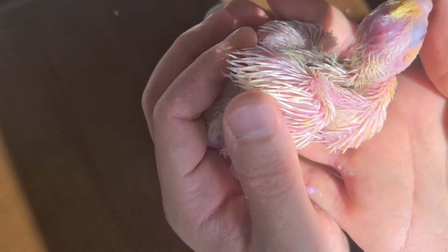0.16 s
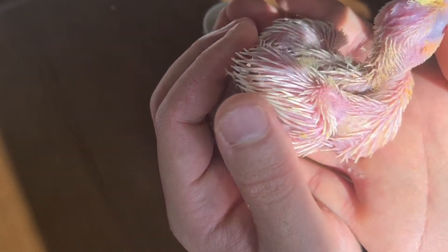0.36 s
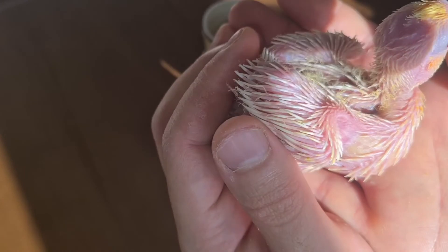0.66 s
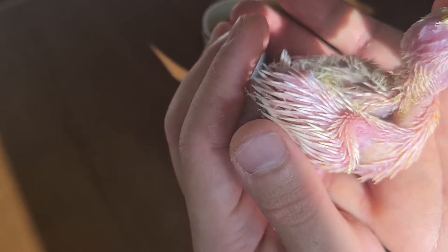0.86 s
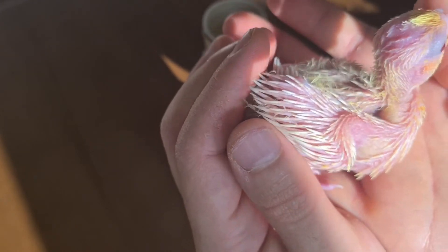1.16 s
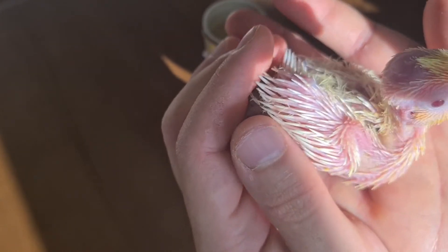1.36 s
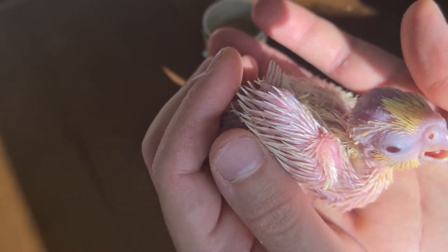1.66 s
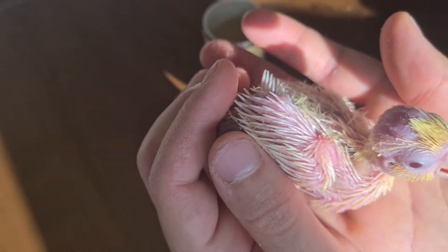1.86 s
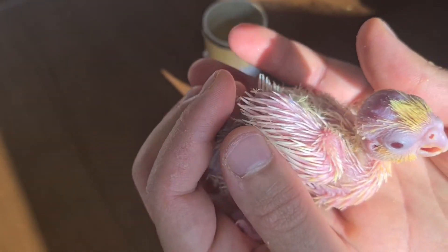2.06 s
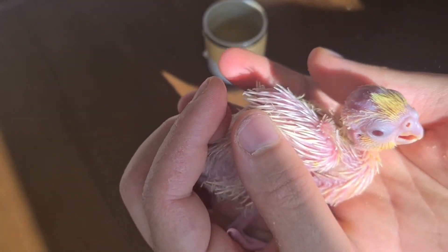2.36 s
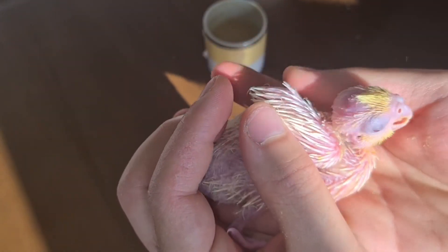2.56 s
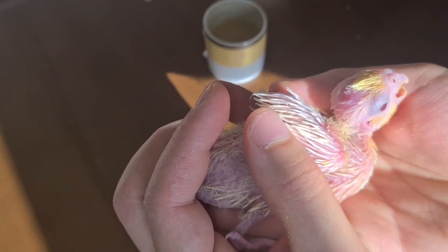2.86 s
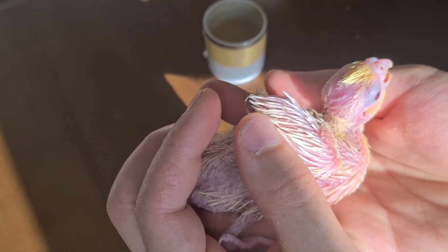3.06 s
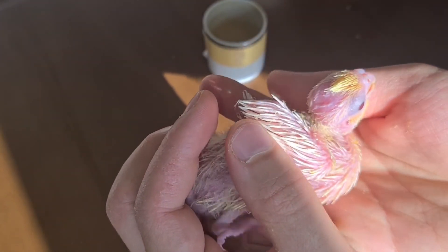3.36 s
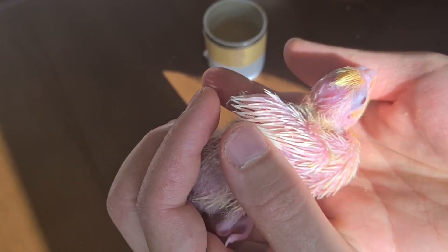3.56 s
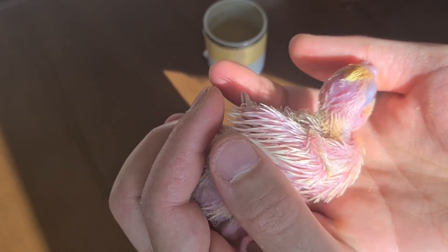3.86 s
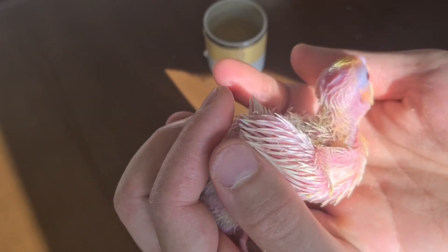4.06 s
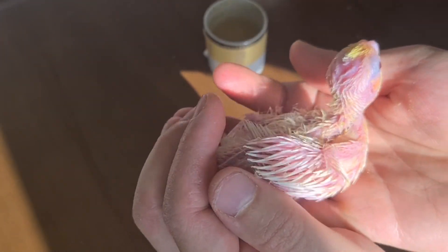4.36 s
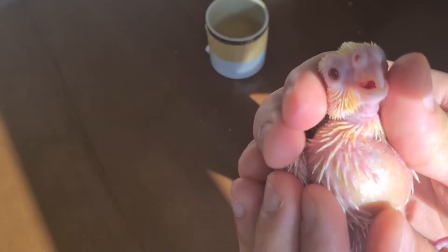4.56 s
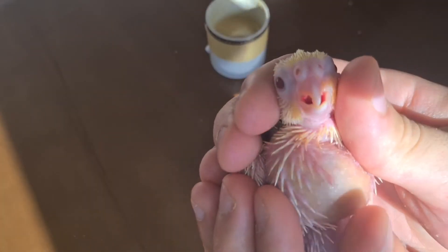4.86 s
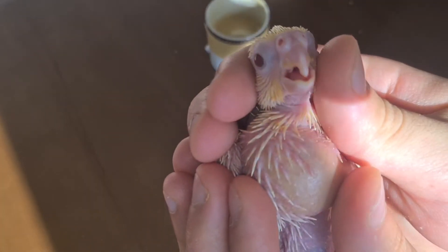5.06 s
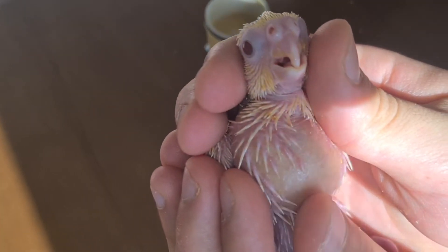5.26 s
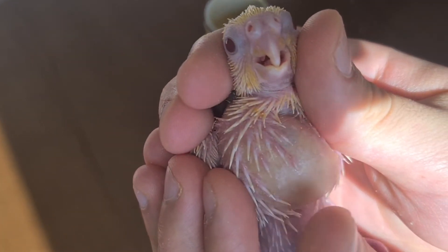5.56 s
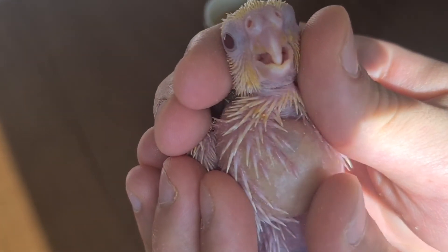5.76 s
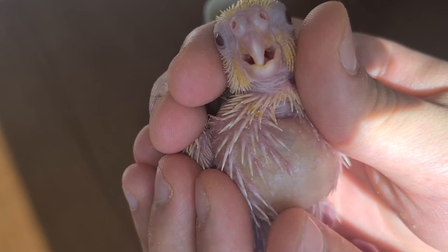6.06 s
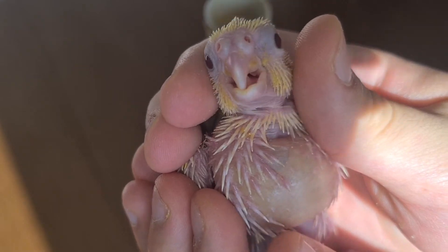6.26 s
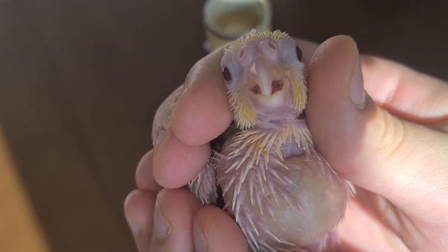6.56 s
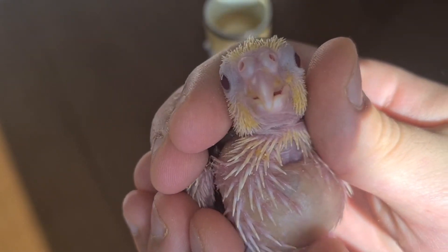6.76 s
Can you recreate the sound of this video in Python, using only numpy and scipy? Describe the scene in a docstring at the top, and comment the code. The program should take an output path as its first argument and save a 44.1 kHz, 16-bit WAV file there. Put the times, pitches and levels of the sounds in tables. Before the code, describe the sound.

A baby parrot held in the hands begs very close to the microphone in a small quiet room. Nine harsh calls, each about half a second, mix a strained high whistle with throaty rasp and airy hiss. Small peeps open many of them and quick falling squeaks close most. The later calls are softer and lean to the left, over faint room noise and low hum.

```python
"""Parrot chick begging in the hands

A parrot chick held in the hands begs again and again in a small quiet room.
Each call is a strained whistle near 4 kHz that keeps slipping into a throat rasp, with hiss from the beak.
Most calls start with small peeps and end in a quick falling squeak, both clean gliding tones.
Late on the chick turns and calls more softly; reflections, a faint echo, room noise and hum lie around it."""
import sys
import numpy as np
from scipy import signal
from scipy.fft import rfft, irfft, next_fast_len
from scipy.io import wavfile
from scipy.ndimage import uniform_filter1d, map_coordinates

SR = 44100
rng = np.random.default_rng(int(sys.argv[2]) if len(sys.argv) > 2 else 0)


def transcribe(u):
    """Save the signal u as a 16-bit wav file named by the first command-line argument.

    u: samples, shape (n,) or (channels, n), limited to [-1, 1]; the rate is SR.
    q: integer samples, one column per channel.
    """
    v = np.clip(np.atleast_2d(u).T, -1, 1)
    q = np.round(v * 32767).astype(np.int16)
    wavfile.write(sys.argv[1], SR, q)


N = 305172


def from_db(db):
    """Decibels to amplitude gain."""
    return 10 ** (np.asarray(db) / 20)


def rms_one(x):
    """Scale to unit rms."""
    return x / np.sqrt(np.mean(x ** 2) + 1e-20)


def in_time(rows):
    """Interpolate each column of a curve at every sample; the first column is time in s."""
    s, *columns = np.transpose(rows)
    return [np.interp(np.arange(N) / SR, s, c) for c in columns]


def at_bins(points, size):
    """Interpolate a table over log frequency at the bins of a transform."""
    hz, value = np.transpose(points)
    bin_hz = np.arange(size // 2 + 1) * SR / size
    return np.interp(np.log(bin_hz + 1), np.log(hz), value)


def colour(x, spectrum):
    """Filter by a smooth (Hz, dB) spectrum."""
    size = next_fast_len(x.shape[-1] + 2048)
    gain = from_db(at_bins(spectrum, size))
    return irfft(rfft(x, size) * gain, size)[..., :x.shape[-1]]


def wander(rate_hz):
    """Random motion of unit rms: noise low-passed at the given rate."""
    lowpass = signal.butter(2, rate_hz, fs=SR, output="sos")
    settled = signal.sosfilt(lowpass, rng.standard_normal(N + SR))[SR:]
    return rms_one(settled)


def resonate(x, centre_hz, width_hz):
    """Two-pole resonance whose centre may move: shift to 0 Hz, smooth, shift back; rms 1."""
    turn = np.exp(2j * np.pi * np.cumsum(centre_hz * np.ones(N)) / SR)
    r = np.exp(-np.pi * width_hz / SR)
    smoothed = signal.lfilter([1], [1, -2 * r, r * r], x / turn + 1e-18)
    return rms_one((smoothed * turn).real)


def bounded(x, firmness):
    """The membrane's swing is limited, so puffs come out more alike in size; rms 1."""
    x = rms_one(x)
    envelope = abs(signal.hilbert(x))
    return rms_one(x / np.sqrt(1 + abs(firmness) * envelope ** 2))


def evened(gate):
    """Hold the local mean power of a pulsing gate near 1, however dense its pulses."""
    return gate / np.sqrt(uniform_filter1d(gate ** 2, size=1500) + 1e-3)


def begging():
    """Whistle, throat rasp and beak hiss, driven by pitch and effort and shaken by the same slips; stereo."""
    # calls: start_s, end_s, beak_opening_time_constant_s, throat_hz, hiss_db at usual pitch and effort,
    # rush_db re throat ring, low_ring_db re rasp, top_treble_db, hiss_near_6khz_db, whistle_jitter_hz
    calls = np.array([(-0.2, 0.457, .03, 1750, -41, -1, -18.5, -7, 0.5, 530),
                      (0.675, 1.266, 0.16, 1746, -40, -3.5, -17, -4.5, -3, 390),
                      (1.677, 2.51, 0.0094, 1735, -43, -8, -14.5, 0, -3.5, 470),
                      (2.745, 3.373, 0.03, 1727, -46, 1, -20, -1.5, 6, 517),
                      (3.691, 4.272, 0.009, 1740, -39, 10.5, -33.5, -7, -10.5, 377.5),
                      (4.46, 4.669, 0.076, 1600, -43.5, -0.5, -16, -1.5, -5.5, 624),
                      (4.881, 5.421, 0.0097, 1680, -46.5, 26.5, -20, 0.5, 1, 510),
                      (5.671, 6.229, 0.019, 1628, -45, 23, -13.5, -2.5, -4, 563),
                      (6.548, 6.952, 0.033, 1560, -44, 18, -13, -3, 1.5, 519.8)])
    # push on each call: time_s, pitch_hz, effort_db (rasp level), whistle_db, roughness_0_to_1
    push = [
        [(0.02, 3750, -39, -39.5, 0.51), (0.075, 4300, -33.5, -38.5, 0.97), (0.225, 4230, -33, -38, 0.95),
         (0.26, 3700, -35.5, -38, 0.45), (0.32, 3680, -37.5, -42.5, 0.35), (0.37, 3950, -35.5, -39, 0.38),
         (0.432, 3925, -37.5, -41, 0.6)],
        [(0.68, 3100, -55, -60, 0.22), (0.716, 3149, -57, -58, 0.2), (0.738, 3613, -38, -44.5, 0.27),
         (0.8, 3580, -40, -40, 0.33), (0.85, 3665, -35.5, -38.5, 0.44), (0.935, 3845, -31.5, -38.5, 0.52),
         (1.0, 3850, -34, -39, 0.51), (1.12, 3850, -35, -38, 0.45), (1.19, 4084, -35, -36.5, 0.53),
         (1.235, 4439, -32.5, -33.5, 0.58), (1.258, 4295, -38, -30.5, 0.34)],
        [(1.686, 3650, -43.5, -39, 0.16), (1.703, 3650, -51, -34.5, 0.17), (1.716, 3650, -40.5, -39.5, 0.5),
         (1.8, 3814, -37, -38.5, 0.65), (1.87, 3845, -35, -37.5, 0.8), (1.94, 4200, -33, -37, 0.86),
         (2.02, 4280, -31.5, -36.5, 0.7), (2.09, 4448, -31, -32, 0.49), (2.24, 4598, -31.5, -29.5, 0.5),
         (2.43, 4657, -30, -30, 0.48), (2.494, 4877, -29.5, -30.5, 0.55)],
        [(2.751, 3930, -44, -41, 0.14), (2.771, 3950, -56, -49, 0.11), (2.781, 4079, -32, -45, 0.39),
         (2.84, 4400, -37, -41, 0.49), (2.87, 4526, -35.5, -36.5, 0.41), (2.91, 4300, -33.5, -36.5, 0.47),
         (3.0, 4680, -35, -32, 0.3), (3.05, 4820, -33, -32, 0.63), (3.15, 4750, -32.5, -32.5, 0.72),
         (3.24, 4960, -32.5, -29.5, 0.63), (3.31, 5116, -35, -28.5, 0.65), (3.355, 5550, -35, -27.5, 0.63)],
        [(3.698, 3440, -40, -43.5, 0.75), (3.725, 3565, -30, -38.0, 0.84), (3.83, 3446, -34, -37, 0.73),
         (3.885, 3746, -30, -41, 0.65), (3.96, 3870, -33.5, -41, 0.47), (4.045, 3993, -36.5, -38, 0.39),
         (4.09, 4046, -32.5, -38, 0.42), (4.175, 4130, -33.0, -35.5, 0.54), (4.21, 4139, -36.5, -40, 0.51),
         (4.255, 4420, -32.5, -36, 0.55)],
        [(4.466, 3550, -52, -58, 0.37), (4.497, 3773, -42.5, -50, 0.5), (4.53, 4040, -33, -55, 0.86),
         (4.58, 4257, -35, -44.5, 0.89), (4.662, 4450, -32, -39.5, 0.84)],
        [(4.888, 3155, -57, -47, 0.2), (4.94, 3392, -46, -41.5, 0.25), (4.96, 3524, -46, -37, 0.42),
         (5.005, 3736, -44, -38, 0.55), (5.03, 4202, -49, -40, 0.33), (5.062, 4191, -46, -37, 0.28),
         (5.098, 4015, -66, -44, 0.15), (5.125, 4067, -41, -39, 0.42), (5.2, 3952, -42.5, -39.5, 0.42),
         (5.278, 4165, -34, -36.5, 0.43), (5.3, 4793, -35.5, -33.5, 0.51), (5.335, 4653, -35, -34.5, 0.45),
         (5.372, 4850, -38, -31, 0.37), (5.408, 5350, -44, -28.5, 0.27)],
        [(5.679, 3327, -48.5, -38, 0.64), (5.725, 3502, -39, -41.5, 0.92), (5.76, 3740, -38, -39, 0.34),
         (5.8, 3680, -47, -42, 0.23), (5.865, 3845, -38, -42, 0.37), (5.912, 3660, -45, -43, 0.35),
         (5.955, 3786, -41, -42.5, 0.36), (6.035, 3657, -56, -42.5, 0.17), (6.075, 3960, -36.5, -36.5, 0.42),
         (6.108, 4210, -38, -34, 0.27), (6.128, 4586, -53, -32, 0.3), (6.155, 4100, -51.5, -39, 0.27),
         (6.19, 4480, -41.5, -35, 0.44), (6.21, 4786, -38, -31, 0.6)],
        [(6.555, 3185, -50.5, -40.5, 0.2), (6.582, 3710, -41.0, -41, 0.45), (6.64, 3576, -44.5, -40.5, 0.34),
         (6.7, 3630, -51.5, -40.5, 0.27), (6.745, 3710, -48, -47, 0.37), (6.785, 3600, -57.5, -39.5, 0),
         (6.835, 3775, -47, -39, 0.24), (6.91, 3820, -47.5, -39.5, 0.26)],
    ]
    # brief narrowings of the beak within a call: time_s, half_length_s, shut_share_0_to_1
    narrowings = [(3.823, 0.022, 0.8)]
    # throat squeezed briefly within one call: time_s, half_length_s, resonance_rise_hz, rush_db
    squeeze_s, half_s, rise_hz, squeezed_db = (5, .03, 1049.5, -7)
    usual_hz, usual_effort_db = 4146, -36.5
    hiss_db_per_octave, shut_beak_db = 13.5, -15.5
    tight_above_hz, throat_hz_per_pitch_hz, throat_waver_hz = 4500, 0.53, 25
    low_ring_db_per_octave = -26
    dive_octaves, dive_s, dive_fade = 0.4, 0.004, 0.85  # fade: share of whistle amplitude lost
    sputter_db, sputter_db_per_octave, sputter_ratio = -6.5, 3, 1.137
    mixing_db = -18.5

    t = np.arange(N) / SR
    call_index = np.searchsorted((calls[:-1, 1] + calls[1:, 0]) / 2, t)
    (start, end, opening_s, throat_hz, hiss_db,
     rush_db, low_db, top_db, hollow_db, jitter_hz) = calls[call_index].T
    age = np.maximum(t - start, 0)
    calling = uniform_filter1d(1. * (t >= start) * (t <= end), size=200)
    shut = np.exp(-age / opening_s)
    for s, half, share in narrowings:
        shut = shut + share * np.exp(-((t - s) / half) ** 2)

    pitch_hz, effort_db, whistle_db, rough = in_time(np.vstack(push))
    rough = np.clip(rough, .05, 1)
    octaves = np.log2(pitch_hz / usual_hz)
    # hiss grows with pitch and effort, but effort adds no more above its usual level
    weak_effort_db = np.minimum(effort_db - usual_effort_db, 0)
    hiss_db = hiss_db + hiss_db_per_octave * octaves + weak_effort_db + shut_beak_db * shut

    # the throat tightens at high pitch and never holds quite still
    throat_hz = throat_hz + throat_hz_per_pitch_hz * np.maximum(pitch_hz - tight_above_hz, 0)
    throat_hz = throat_hz + throat_waver_hz * wander(40)
    squeezed = np.exp(-((t - squeeze_s) / half_s) ** 2)
    throat_hz = throat_hz + rise_hz * squeezed
    rush_db = rush_db + squeezed_db * squeezed
    low_db = low_db + low_ring_db_per_octave * octaves

    slip = slips(rough, unevenness=.4, size_db=6.5)
    # the whistle sinks and fades around the end of each call
    dive = np.exp(-abs(end - t) / dive_s)
    diving_hz = pitch_hz * 2 ** (-dive_octaves * dive)
    tone = (1 - dive_fade * dive) * whistle(
        diving_hz, rough, slip, jitter_hz, strain_hz=4433, waver_hz=51.9, sag_hz=300,
        choke=0.7, flutter=0.2, throb=0.11, overtone_db=-23.5, recovery_hz=40)
    # noisy fringe above the whistle, stronger at high pitch
    fringe = resonate(rng.standard_normal(N), sputter_ratio * pitch_hz, width_hz=1500)
    sputter = rough * from_db(sputter_db + sputter_db_per_octave * octaves) * fringe
    throat = rasp(slip, throat_hz, rush_db, low_db, leak=0.3)
    # the rasp shakes the whistle: side bands that follow its pitch
    shaken_tone = tone * (1 + from_db(mixing_db) * throat)
    voice = from_db(whistle_db) * (shaken_tone + sputter) + from_db(effort_db) * throat
    hiss = from_db(hiss_db) * beak_hiss(slip, top_db, hollow_db, steady=0.71, spread=0.68)
    return calling * (voice + hiss)


def whistle(pitch_hz, rough, slip, jitter_hz, strain_hz, waver_hz, sag_hz, choke, flutter, throb,
            overtone_db, recovery_hz):
    """Strained tone: shakes more when rough and high, sags and fades at each slip, then recovers its pitch."""
    shake = wander(420.4)
    strain = rough ** 1.3 * np.maximum(pitch_hz / strain_hz, .97) ** 2.8
    recovery = signal.butter(1, recovery_hz, "high", fs=SR, output="sos")
    upset_hz = signal.sosfilt(recovery, jitter_hz * strain * shake - sag_hz * slip)
    phase = 2 * np.pi * np.cumsum(pitch_hz + upset_hz + waver_hz * wander(67.8)) / SR
    strength = evened(np.maximum(1 - choke * slip, 0))
    strength = strength * np.exp(flutter * wander(300) + throb * wander(70))
    return rms_one(strength * (np.sin(phase) + from_db(overtone_db) * np.sin(2 * phase)))


def slips(rough, unevenness, size_db):
    """The syrinx membrane slips at uneven moments, more often and for a larger share of the time when rough."""
    # slipping: roughness_0_to_1, slips_per_s before unevenness, slipping_share_of_cycle
    slipping = [(0, 45, 0.18), (0.249, 105, 0.43), (.55, 230, 0.52), (1, 320, 0.81)]
    grade, per_s, share = np.transpose(slipping)
    rate_hz = np.interp(rough, grade, per_s) * np.exp(unevenness * wander(148.8))
    cycles = np.cumsum(rate_hz) / SR
    progress = np.minimum(cycles % 1 / np.interp(rough, grade, share), 1)
    size = from_db(size_db * rng.uniform(-1.5, 0, N))[cycles.astype(int)]  # one draw per slip
    return size * np.sin(np.pi * progress)  # 0 steady, peaks up to 1


def rasp(slip, throat_hz, rush_db, low_db, leak):
    """Each time the tone breaks, a short puff of turbulent air rings the throat."""
    # broad rush of air in the throat: freq_hz, level_db
    rush_spectrum = [(200, -38.5), (550, -2), (800, -12), (1150, -3), (1500, 5), (2300, 3.5), (3000, -1.5),
                     (4000, -4.5), (4900, -10.5), (5700, -40.5), (8000, -22.5)]
    puffs = evened(leak + slip)
    air = rng.standard_normal((4, N))
    narrow = resonate(air[0] * puffs, throat_hz, width_hz=230)
    wide = puffs * bounded(resonate(air[1], throat_hz, width_hz=560), firmness=1.5)
    ring = bounded(narrow + 1.1 * wide, firmness=.2)
    rush = puffs * bounded(colour(air[2], rush_spectrum), firmness=0.19)
    rush = rms_one(colour(rush, [(300, -28.5), (550, -11), (800, -3), (5000, 6.0), (6500, -14.5)]))
    # ring and rush share the rasp's power
    shared = (ring + from_db(rush_db) * rush) / np.sqrt(1 + from_db(2 * rush_db))
    low = from_db(low_db) * resonate(air[3] * puffs, centre_hz=1090, width_hz=810)
    return colour(shared + low, [(550, -15.5), (810, -0.5)])  # so small a throat gives little bass


def beak_hiss(slip, top_db, hollow_db, steady, spread):
    """Air hisses at the beak edges, pulsing with the slips; top treble and the band near 6 kHz vary by call."""
    # hiss reaching each side: freq_hz, left_db, right_db
    hiss_spectrum = np.array([(2960, -30, -27), (5110, -1.5, -3), (6300, -2.5, -10.5), (6900, -4, -5),
                              (7400, 5.5, 1), (7710, 2.5, -0.5), (8550, -16.5, 1.5), (10400, -14, -5.5),
                              (11900, -11, -5), (13970, -17, -29.5), (15500, -30.5, -12.5)])
    jet = rng.standard_normal(N) + spread * rng.standard_normal((2, N))
    jet = jet * (steady + slip)
    hiss = rms_one(np.array([colour(jet[k], hiss_spectrum[:, [0, k + 1]]) for k in range(2)]))
    top = colour(hiss, [(7500, -50.5), (9000, -4.0), (12000, 1)])
    hollow = colour(hiss, [(4500, -21), (5300, -0.5), (6300, -3), (7400, -23)])
    return hiss + top * (from_db(top_db) - 1) + hollow * (from_db(hollow_db) - 1)


def squeaks(settle, shake, third_db):
    """At low pressure the membrane swings cleanly: short glides with two overtones that swell and stop short."""
    # opening peeps, sometimes in a stutter: start_s, length_s, first_hz, last_hz, level_db
    peeps = [(0.65, 0.0204, 2940, 3234, -55.5), (0.671, 0.009, 3200, 2630, -48),
             (1.659, 0.026, 3130, 3500, -38), (2.732, 0.023, 3230, 3360, -41.5),
             (2.756, 0.029, 4465, 3850, -35), (3.671, 0.008, 1860, 2152, -44.5),
             (3.68, 0.017, 3300, 3300, -36), (4.451, 0.0058, 2900, 2950, -43),
             (4.884, 0.011, 3170, 3070, -38.5), (4.898, 0.011, 3394, 3150, -39.5),
             (4.909, .009, 3430, 3230, -38), (4.931, 0.0056, 3630, 3200, -34.5),
             (4.946, 0.0077, 3480, 3100, -38), (5.662, 0.013, 1950, 2212, -38.5),
             (6.538, .014, 2902, 3135, -45)]
    # closing squeaks: start_s, length_s, last_hz, level_db, overtones_db
    closings = [(0.444, 0.0093, 1693, -28, -15), (1.267, 0.012, 1980, -27.5, -10),
                (2.505, 0.0089, 2115, -22, -9), (3.37, 0.012, 2225, -22, -7.5),
                (4.268, 0.013, 1909, -29, -14), (5.421, 0.013, 2207, -25.5, -12.5),
                (6.223, 0.011, 2036, -22.5, -7)]
    peep_overtones_db, fall_octaves_per_s = -21.5, 52
    out = np.zeros(N)
    tremble = wander(220)
    glides = [(*peep, peep_overtones_db) for peep in peeps]
    for start, length, last_hz, level_db, overtones_db in closings:
        first_hz = last_hz * 2 ** (fall_octaves_per_s * length)
        glides.append((start, length, first_hz, last_hz, level_db, overtones_db))
    for start, length, first_hz, last_hz, level_db, overtones_db in glides:
        u = np.linspace(0, 1, int(length * SR))
        at = int(start * SR) + np.arange(len(u))
        hz = last_hz + (first_hz - last_hz) * (1 - u) ** abs(settle)
        phase = 2 * np.pi * np.cumsum(hz * (1 + shake * tremble[at])) / SR
        swell = abs(np.sin(np.pi * u ** 0.85)) ** 0.5
        overtones = from_db(overtones_db) * (np.cos(2 * phase) + from_db(third_db) * np.sin(3 * phase))
        out[at] += from_db(level_db) * rms_one(swell * (np.sin(phase) + swell * overtones))
    return out


def mouth(x):
    """Resonances of the mouth and beak colour the whole voice."""
    # mouth and beak: freq_hz, gain_db
    resonances = [(2100, -1.5), (2600, -2.5), (3150, 1.5), (3450, -1.5), (3800, 0.5), (4800, 0.5),
                  (5500, -4), (6400, 3), (7350, 0), (7900, -4.5), (8700, -0.5), (10000, -3)]
    return colour(x, resonances)


def nearby(x, early_db, early_s):
    """Quick reflections from the hands and table ripple the spectrum, differently on each side."""
    t = np.arange(SR // 30) / SR
    taps = rng.standard_normal((2, len(t))) * (t > .0008) * np.exp(-t / early_s)
    response = from_db(early_db) * rms_one(taps) / np.sqrt(len(t))
    return x + signal.fftconvolve(x, response, axes=1)[:, :N]


def aim(x):
    """The head's direction makes one side louder and earlier."""
    # heading: time_s, left_minus_right_db, right_lag_ms
    heading = [(0, 1, -0.038), (1.2, -1, -0.065), (1.8, 0.5, -0.028), (2.3, -1, -0.037),
               (2.8, -0.5, -0.031), (3.25, 2, -0.028), (3.8, 1.2, -0.015), (4.6, 0.5, -0.048),
               (5.0, 4.5, 0.12), (5.7, 6, 0.17), (6.2, 5.5, 0.18), (6.9, 8, 0.17)]
    pan_db, lag_ms = in_time(heading)
    right = map_coordinates(x[1], [np.arange(N) - lag_ms * SR / 1000], order=3)
    gains = np.sqrt(2 / (1 + from_db([-2 * pan_db, 2 * pan_db])))
    return np.array([x[0], right]) * gains


def room(x, t60, wet_db, ring_width_hz):
    """A faint diffuse tail of decaying noise in which narrow resonances ring on."""
    # echo colour: freq_hz, gain_db
    walls = [(300, -11.5), (1400, -8.5), (2000, -1.5), (2650, 5), (3500, 3), (4500, -2), (7500, -0.5),
             (15000, 11.5)]
    # lingering resonances: freq_hz, t60_s, level_db before band-pass
    lingering = [(1760, .18, -17), (2520, .3, -18), (4330, .42, -21)]
    t = np.arange(SR // 2) / SR
    tail = rng.standard_normal((2, len(t))) * (t > .005) * from_db(-60 * t / t60)
    response = colour(from_db(wet_db) * rms_one(tail) / np.sqrt(len(t)), walls)
    for hz, ring_t60, db in lingering:
        decay = from_db(-60 * t / ring_t60)
        ring = rms_one(rng.standard_normal((2, len(t))) * decay) / np.sqrt(len(t))
        edges_hz = [hz - ring_width_hz / 2, hz + ring_width_hz / 2]
        band = signal.butter(2, edges_hz, "band", fs=SR, output="sos")
        response = response + from_db(db) * signal.sosfilt(band, ring)
    return signal.fftconvolve(x.mean(axis=0)[None], response, axes=1)[:, :N]


def echo_cut(start_s, end_s, depth_db):
    """Echo gain: the sound is cut after the shortest call, so its echo stops abruptly."""
    t = np.arange(N) / SR
    return from_db(depth_db * uniform_filter1d(1. * (t > start_s) * (t < end_s), size=200))


def handling():
    """Fingers shift round the chick: brief dull swells of band-passed noise."""
    # rubs: start_s, length_s, centre_hz, level_db
    rubs = [(1.491, 0.015, 960, -61), (1.641, 0.14, 68.1, -52.5), (4.125, 0.088, 252, -56)]
    out = np.zeros(N)
    for start, length, hz, level_db in rubs:
        count = int(length * SR)
        band = signal.butter(2, [hz * 0.66, hz * 1.3], "band", fs=SR, output="sos")
        rub = signal.sosfilt(band, rng.standard_normal(SR))[-count:]
        swell = signal.windows.tukey(count, .5)
        out[int(start * SR) + np.arange(count)] += from_db(level_db) * rms_one(rub * swell)
    return out


def background():
    """Steady room noise, most alike on both sides in the bass, and low hum from narrow noise bands."""
    # room noise: freq_hz, relative_density_db
    quiet = [(20, -30.5), (36, -1.5), (140, -9.5), (204, -8), (552, -12.5), (800, -18), (1200, -19.5),
             (1900, -28), (8130, -42.5), (15500, -43)]
    # left-right likeness: freq_hz, correlation_0_to_1
    likeness = [(40, .93), (130, 0.81), (280, 0.89), (600, 0.18), (2000, 0.26), (10000, 0.18)]
    # wavering hum: freq_hz, level_db
    hums = [(63.5, -71), (126, -70)]
    quiet_db = -59.5
    alike = np.clip(at_bins(likeness, N), 0, 1)
    mid, side = rfft(rng.standard_normal((2, N)))
    noise = irfft(np.sqrt(1 + alike) * mid + np.sqrt(1 - alike) * side * [[1], [-1]], N)
    hum = sum(from_db(db) * resonate(rng.standard_normal(N), hz, width_hz=7.0) for hz, db in hums)
    return from_db(quiet_db) * rms_one(colour(noise, quiet)) + hum


def scene():
    """The chick close by, its echo, the hands and the room's own noise."""
    voice = mouth(begging() + squeaks(settle=2.3, shake=0.035, third_db=-5.5))
    chick = nearby(voice, early_db=-6.5, early_s=0.0024)
    echo = room(chick, t60=0.24, wet_db=-15.0, ring_width_hz=320)
    echo = echo * echo_cut(start_s=4.672, end_s=5.3, depth_db=-36.0)
    return aim(chick) + echo + background() + handling()


def record(dry):
    """Steep elliptic low-pass takes off the top treble."""
    cutoff_hz = 15850
    lowpass = signal.ellip(12, .1, 80, cutoff_hz, fs=SR, output="sos")
    return signal.sosfilt(lowpass, dry)


dry = scene()
out = record(dry)
transcribe(out)
```